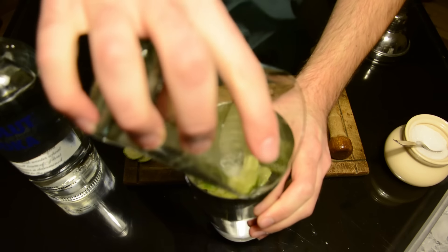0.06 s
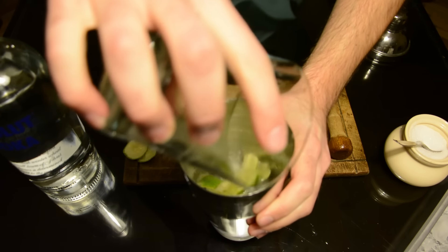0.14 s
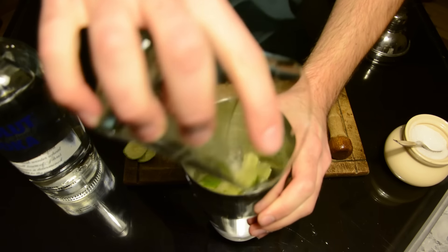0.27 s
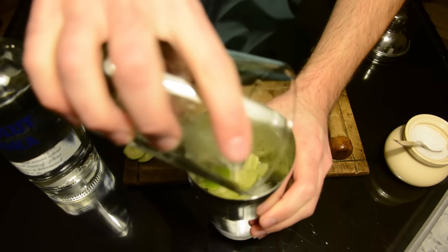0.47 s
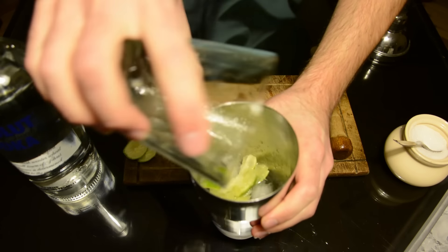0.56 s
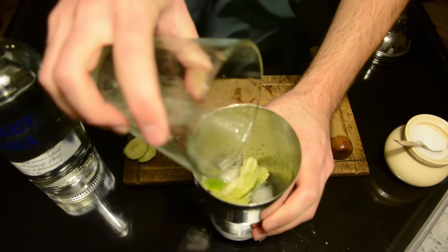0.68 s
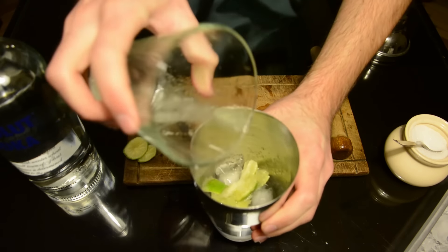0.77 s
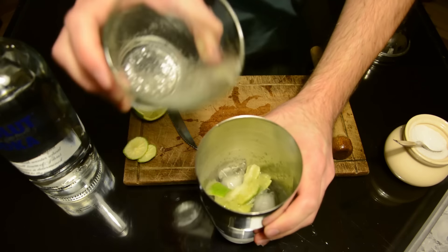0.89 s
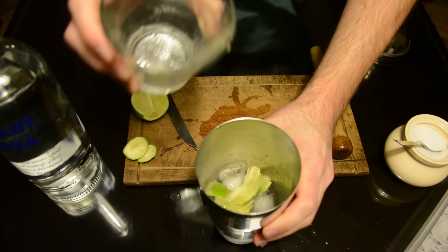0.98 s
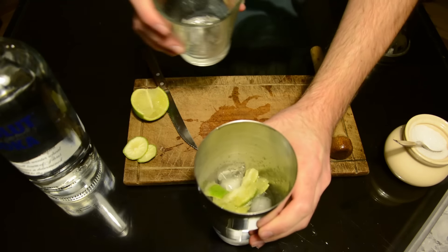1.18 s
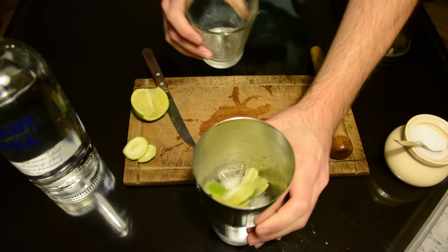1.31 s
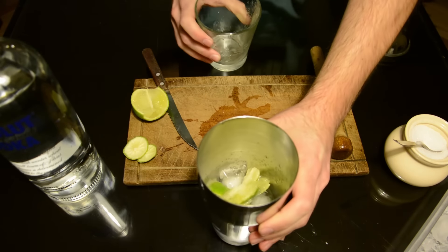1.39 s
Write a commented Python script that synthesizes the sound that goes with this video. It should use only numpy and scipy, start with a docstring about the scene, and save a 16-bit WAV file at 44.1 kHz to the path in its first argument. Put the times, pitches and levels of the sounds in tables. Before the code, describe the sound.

Sharp clink of glass on a metal cup, then a knock on the table.

```python
"""A drinking glass clinks on the rim of a hand-held steel cup: a crack, quickly choked modes, a thin ring.
The glass is then set down with a dull knock, ringing the table and rocking flat on its base.
A small live room answers both blows; each briefly overloads the close stereo microphone.
Behind them: a steady fan-like rush, two faint ticks and the dying ring of an earlier touch."""
import sys
import numpy as np
from scipy import signal
from scipy.fft import rfft, irfft, next_fast_len
from scipy.io import wavfile
from scipy.ndimage import map_coordinates

SR = 44100
rng = np.random.default_rng(int(sys.argv[2]) if len(sys.argv) > 2 else 0)


def wav_out(sig):
    """Save sig, one row per channel (or a flat mono array), as 16-bit PCM at SR to the path in sys.argv[1]."""
    wavfile.write(sys.argv[1], SR, np.round(np.clip(np.atleast_2d(sig).T, -1, 1) * 32767).astype(np.int16))


N = 63945

# stereo width of diffuse room sound (frequency [Hz], side minus mid [dB])
ROOM_SIDE = [(100, -30), (300, -32), (1000, -32), (2200, -20.5), (3500, -14.5), (6000, -11.5), (10000, -4)]


def amp(db):
    """Decibels to gain."""
    return 10 ** (np.asarray(db) / 20)


def unit(x):
    """Scale to rms 1."""
    return x / np.sqrt(np.mean(x ** 2) + 1e-20)


def along(points, hz):
    """Interpolate (Hz, value) points on a log frequency axis."""
    freqs, values = np.transpose(points)
    return np.interp(np.log(hz + 1), np.log(freqs + 1), values)


def filtered(x, response):
    """Apply the gain response(hz) by FFT."""
    size = next_fast_len(N + SR // 2)
    return irfft(rfft(x, size) * response(np.fft.rfftfreq(size, 1 / SR)), size)[..., :N]


def shaped(x, curve_db):
    """Filter by a (Hz, dB) curve."""
    return filtered(x, lambda hz: amp(along(curve_db, hz)))


def noise(spectrum_db):
    """Coloured noise, rms 1."""
    return unit(shaped(rng.standard_normal(N), spectrum_db))


def since(start_s):
    """Seconds since start_s, zero before."""
    return np.maximum(np.arange(N) / SR - start_s, 0)


def fade(start_s, t60_s, attack_s=0.00056):
    """Fast rise, exponential decay."""
    t = since(start_s)
    return (1 - np.exp(-t / attack_s)) * np.exp(-np.log(1000) * t / t60_s)


def ring(start_s, modes, attack_s=0, attack_cycles=0):
    """Struck damped modes; rise time is attack_s plus attack_cycles periods."""
    return sum(amp(db + rng.normal(0, 0.17))
               * fade(start_s, t60_s, attack_s + attack_cycles / hz)
               * np.sin(2 * np.pi * hz * since(start_s)) for hz, db, t60_s in modes)


def spread(pair, side_db):
    """Two unrelated signals as mid and side, to left and right."""
    mid, side = pair[0], shaped(pair[1], side_db)
    return np.array([mid + side, mid - side])


def ports(x, left_lead_s, left_db):
    """Time and level difference of a near source at the two microphone ports."""
    half = np.array([[.5], [-.5]])
    return filtered(x, lambda hz: amp(half * left_db) * np.exp(2j * np.pi * hz * half * left_lead_s))


def room(x, delay_s=0.0053, build_s=0.0052):
    """Diffuse reverberation: builds up, then each frequency decays at its own rate."""
    # room decay (frequency [Hz], t60 [s])
    decay = [(150, 0.54), (400, 0.36), (1000, 0.45), (2700, 0.49), (7000, 0.41), (11000, 0.31),
             (15000, 0.2)]
    # room colour (frequency [Hz], gain [dB])
    colour = [(60, -14), (110, -15), (165, 4), (260, -5.5), (335, 4.5), (640, -1), (1200, 1), (2200, 0),
              (4000, 2.5), (8000, -0.5), (11000, -0.5), (15000, -3)]
    hz, t, spectra = signal.stft(rng.standard_normal((2, N)), SR, nperseg=256)
    spectra *= np.exp(-np.log(1000) * t / along(decay, hz)[:, None])
    tail = signal.istft(spectra, SR, nperseg=256)[1][:, :N]
    tail *= 1 - np.exp(-since(delay_s) / build_s)
    tail = shaped(tail / np.linalg.norm(tail[0]), colour)
    return signal.fftconvolve(x[None], spread(tail, ROOM_SIDE), axes=1)[:, :N]


def fan(level_db=-37.5, wander_db=0.07, wander_hz=12):
    """Steady fan-like mid-range rush; the level wanders slightly."""
    # rush spectrum (frequency [Hz], relative density [dB])
    spectrum = [(25, -25), (70, -17.5), (120, -12.5), (165, -3), (215, -8.5), (300, -4), (430, -9),
                (600, 0), (900, 0), (1080, 2), (1500, -5), (2500, -17.5), (4000, -26.5), (8000, -34.5),
                (15000, -44)]
    # stereo width (frequency [Hz], side minus mid [dB])
    width = [(50, -23), (180, -21.5), (400, -14.5), (700, -18.5), (1100, -22.5), (2200, -7.5), (5000, -1),
             (15000, -2.5)]
    wander = map_coordinates(rng.standard_normal(N // 100), [np.arange(N) * wander_hz / SR])
    return amp(level_db + wander_db * wander) * spread([noise(spectrum), noise(spectrum)], width)


def earlier_touch(level_db=-39.5, t60_s=0.42):
    """The cup's ring from an earlier touch dies away in the room."""
    # diffuse ring (frequency [Hz], relative density [dB])
    spectrum = [(1500, -16), (2000, -3), (2180, 1.5), (2400, -17), (3050, -9), (3800, -19.5), (4240, 1),
                (4600, -22), (6600, -26), (7250, -13.5), (8000, -31), (9200, -26.5), (12000, -44)]
    return amp(level_db) * fade(0, t60_s) * spread([noise(spectrum), noise(spectrum)], ROOM_SIDE)


def ticks():
    """Two faint bursts of band noise."""
    # ticks (time [s], level [dB], centre [Hz], width [octaves], t60 [s])
    bursts = [(0.987, -28.5, 990, 0.4, .03), (1.228, -39.5, 10200, 0.32, 0.014)]

    def band(centre_hz, width_oct):
        bell = lambda hz: np.exp(-.5 * (np.log2((hz + 1) / centre_hz) / width_oct) ** 2)
        return unit(filtered(rng.standard_normal(N), bell))

    return sum(amp(db) * fade(s, t60_s) * band(hz, octaves) for s, db, hz, octaves, t60_s in bursts)


def knock(thud_db=-7.5, thud_t60_s=0.029, room_db=-7.5):
    """Glass on table: the landing rings the modes, each contact of the rocking base thuds."""
    # base contacts (time [s], relative level [dB])
    landings = [(1.1243, 5.5), (1.1315, -7.5), (1.138, -6)]
    # modes of table top and glass base (frequency [Hz], level [dB], t60 [s])
    table_modes = [(165, -26, .12), (272, -6, .06), (325, -16, .15), (412, -9, .08), (570, -13, .08),
                   (655, -7, .065), (735, -18, .06), (1015, -10, .06), (1250, -12, .03), (1375, -12, .035),
                   (1650, -23, .03), (1870, -23, .03), (2480, -21, .016), (3660, -20, .012)]
    # blunt contact (frequency [Hz], relative density [dB])
    thud_spectrum = [(30, -32), (100, -19), (170, -12), (260, -5.5), (600, -0.5), (850, -6), (1300, -4),
                     (1600, -9), (2500, -14), (3800, -22.5), (5000, -30.5), (9000, -41), (15000, -53.5)]
    # radiation of the modes into the room (frequency [Hz], gain [dB])
    radiation = [(150, -0.5), (700, 1), (1100, 2), (1400, -8), (2500, -1), (3700, -12)]
    thuds = sum(amp(thud_db + db) * fade(s, thud_t60_s) * noise(thud_spectrum) for s, db in landings)
    modes = ring(landings[0][0], table_modes, attack_cycles=0.5)
    direct = ports(thuds + modes, left_lead_s=-1e-5, left_db=0.24)
    radiated = thuds + shaped(modes, radiation)
    return direct + amp(room_db) * room(radiated)


def clink(start_s=0.2243, attack_s=0.0013, free_s=0.0212, choke_t60_s=0.033,
          crack_db=-8, sing_db=-34, room_db=-10.5):
    """Glass on steel: a crack, directional modes choked after free_s, then the glass sings on."""
    # modes of cup and glass in contact
    # (frequency [Hz], level [dB], t60 [s], extra into room [dB], left minus right [dB])
    rim_modes = [(634.7, -4.5, 0.12, -2.5, -1), (1023, -18, 0.11, 1.5, -1), (1402, -8.5, .03, -2, -0.5),
                 (1870, -13, 0.075, -3, -1), (2062, -8.5, 0.038, 4.5, 5.5), (2136, 4.5, .04, -3.5, -1.6),
                 (2177, -16.5, 0.11, 3.5, -7), (2798, -18.5, 0.1, 5.5, .5), (3494, -19, 0.056, 6, 7),
                 (4205, -17, 0.47, -1, -1), (4314, -18, 0.038, 10, 7), (7070, -16.5, 0.064, -4, -3),
                 (7650, -21.5, 0.055, 4.5, 10), (9100, -27.5, .08, 4, -6), (9250, -26.5, 0.049, 2.5, 5),
                 (10770, -17.5, 0.097, -7.5, -.5)]
    # hard contact (frequency [Hz], relative density [dB])
    crack_spectrum = [(30, -20), (120, -14), (300, -5), (700, -5), (1200, 5.5), (1620, -12.5), (2000, 5),
                      (2500, -9.5), (3500, 0.5), (5500, -6.5), (8000, -9), (11000, -12), (13000, -25),
                      (16000, -26)]
    # modes of the free glass (frequency [Hz], relative level [dB], t60 [s])
    glass_modes = [(2840, -6, .42), (4160, -6, 0.56), (4180, -4, 0.74), (7000, -22, .3), (10750, 1, 0.17)]
    *_, send_db, left_db = np.transpose(rim_modes)
    choke = np.exp(-np.log(1000) * since(start_s + free_s) / choke_t60_s)
    modes = choke * np.array([ring(start_s, [mode[:3]], attack_s) for mode in rim_modes])
    crack = amp(crack_db) * fade(start_s, t60_s=0.035) * noise(crack_spectrum)
    sing = amp(sing_db) * ring(start_s, glass_modes, attack_s)
    panned = amp([left_db / 2, -left_db / 2]) @ modes
    direct = crack + ports(panned + sing, left_lead_s=1e-5, left_db=0)
    radiated = amp(send_db) @ modes + crack + sing
    return direct + amp(room_db) * room(radiated)


def scene():
    """Both blows and the small sounds over the rush, in stereo."""
    return earlier_touch() + clink() + knock() + ticks() + fan()


def record(dry, ceiling=0.91, hardness=5.6, top_hz=15750):
    """Microphone overload: soft clip, then band limit."""
    clipped = dry / (1 + np.abs(dry / ceiling) ** hardness) ** (1 / hardness)
    return filtered(clipped, lambda hz: hz < top_hz)


dry = scene()
out = record(dry)
wav_out(out)
```